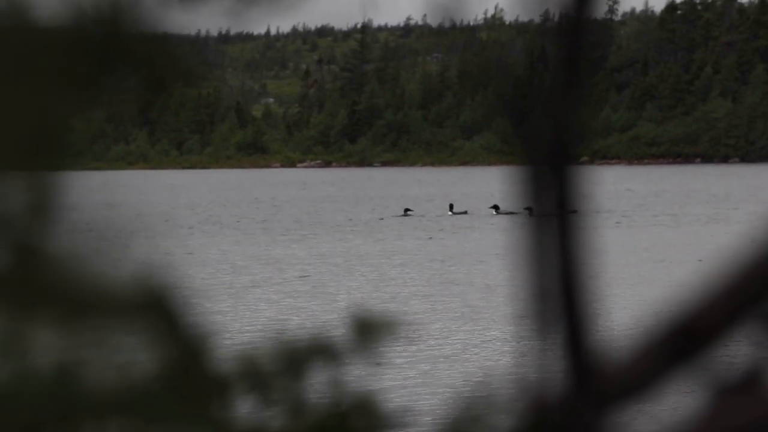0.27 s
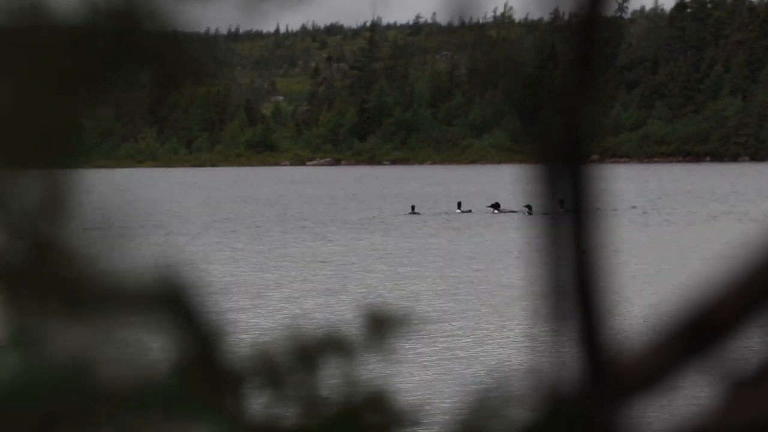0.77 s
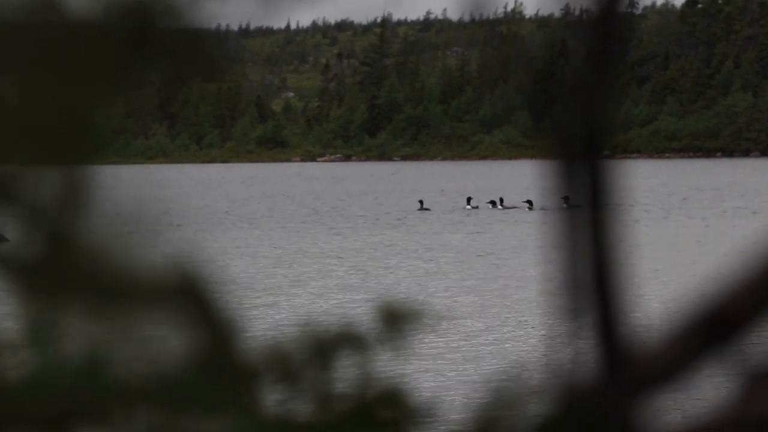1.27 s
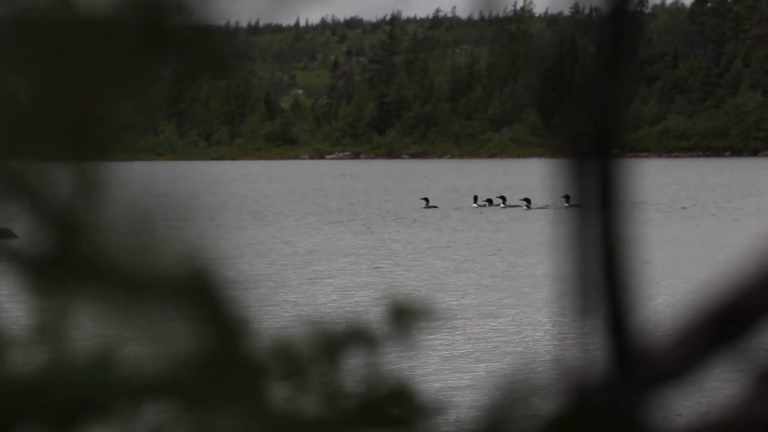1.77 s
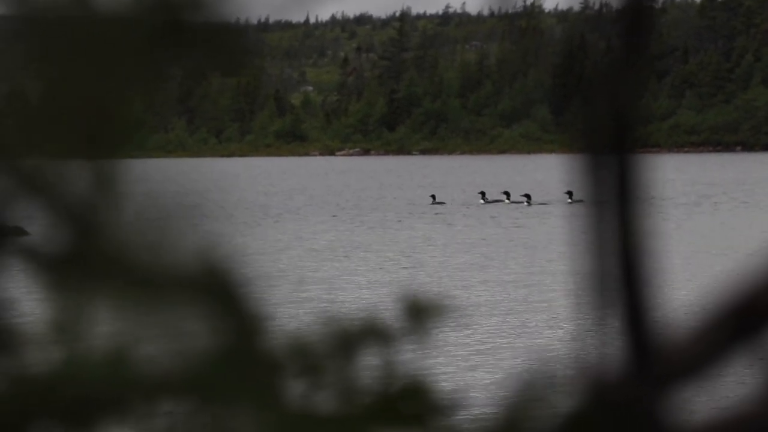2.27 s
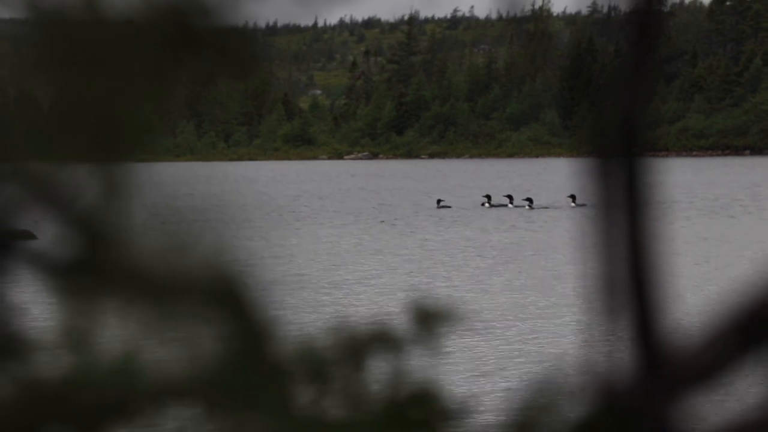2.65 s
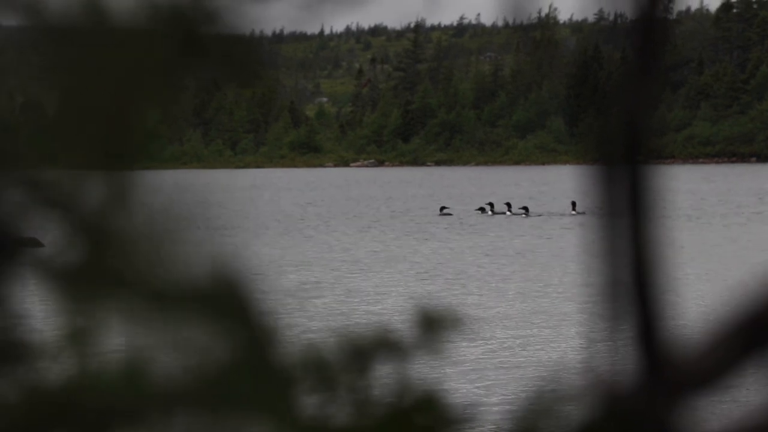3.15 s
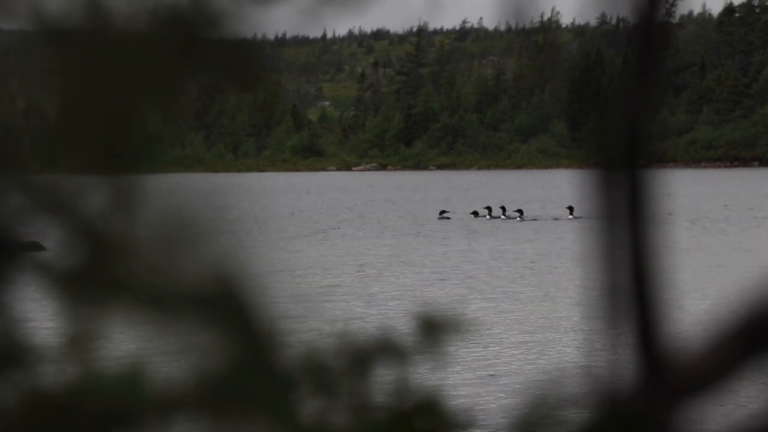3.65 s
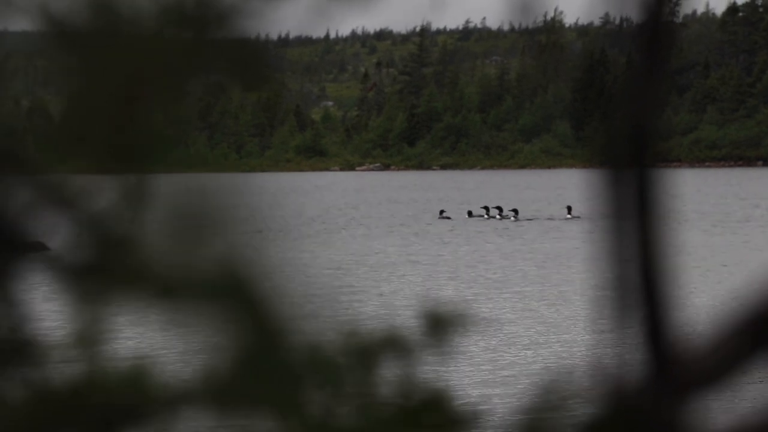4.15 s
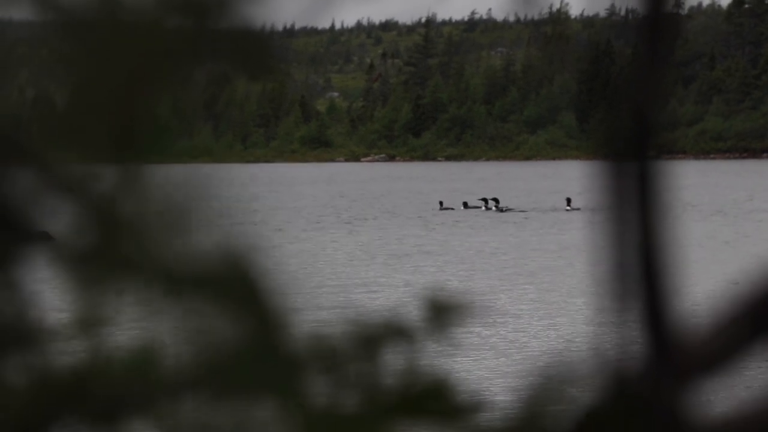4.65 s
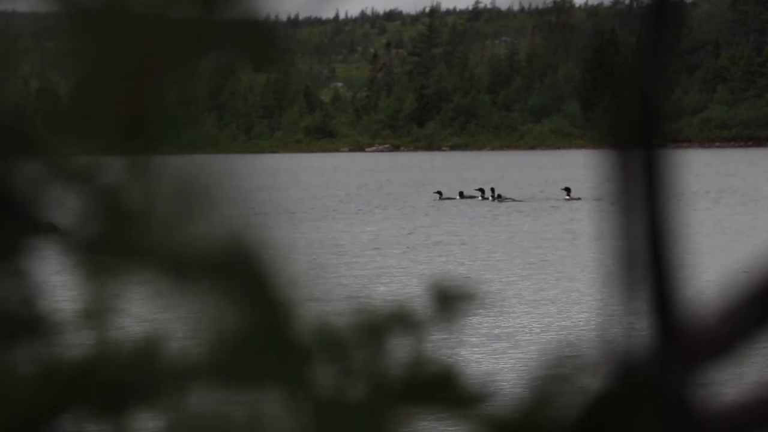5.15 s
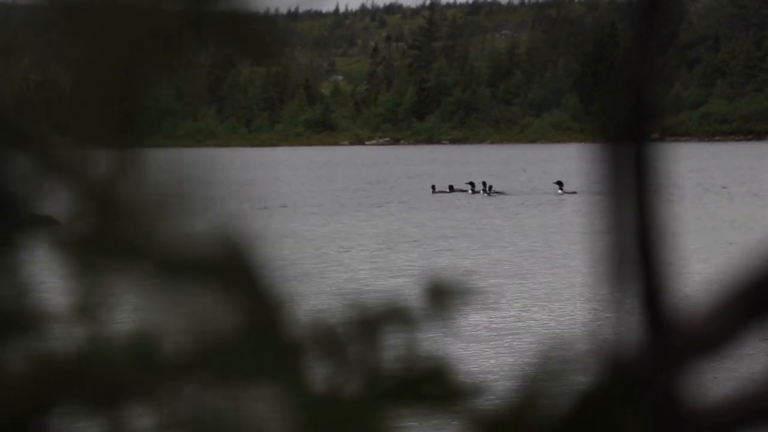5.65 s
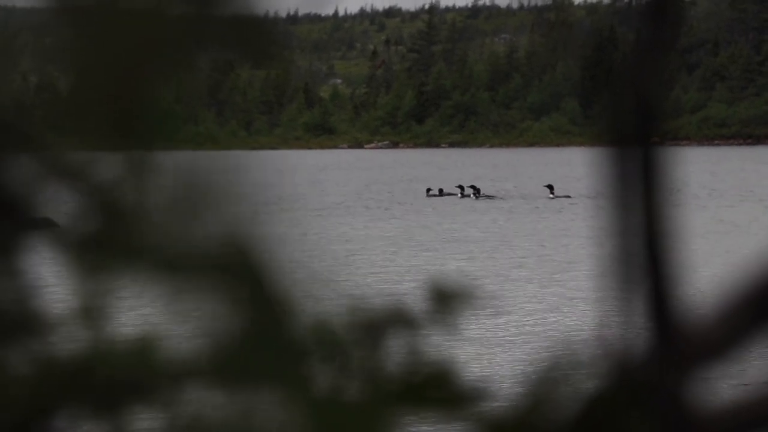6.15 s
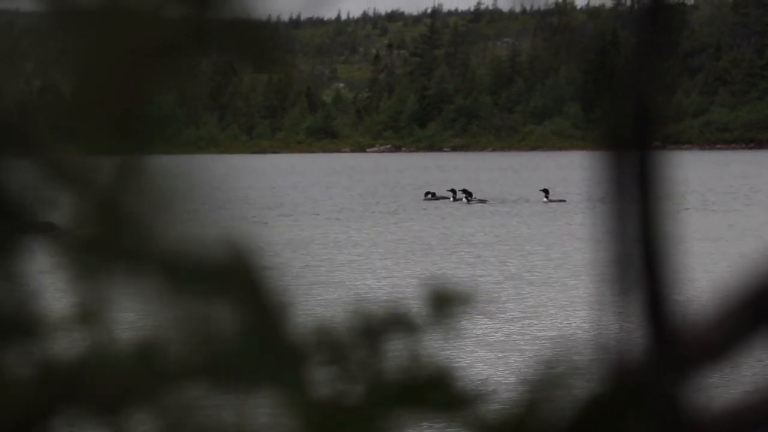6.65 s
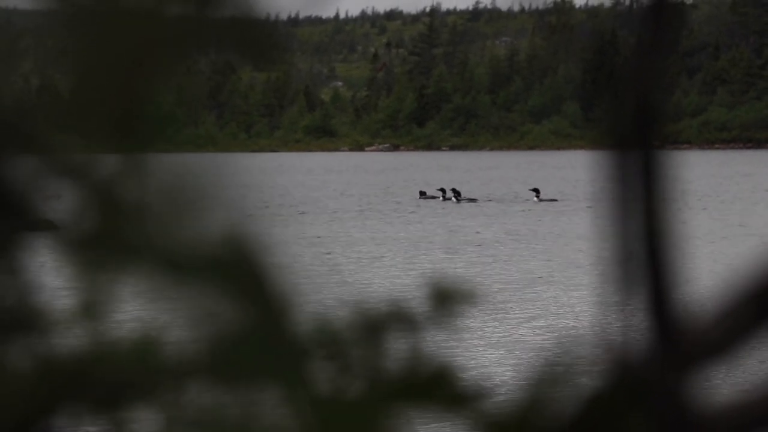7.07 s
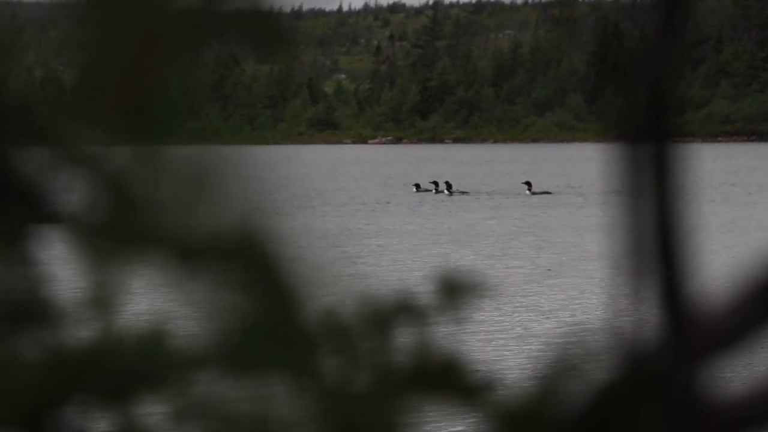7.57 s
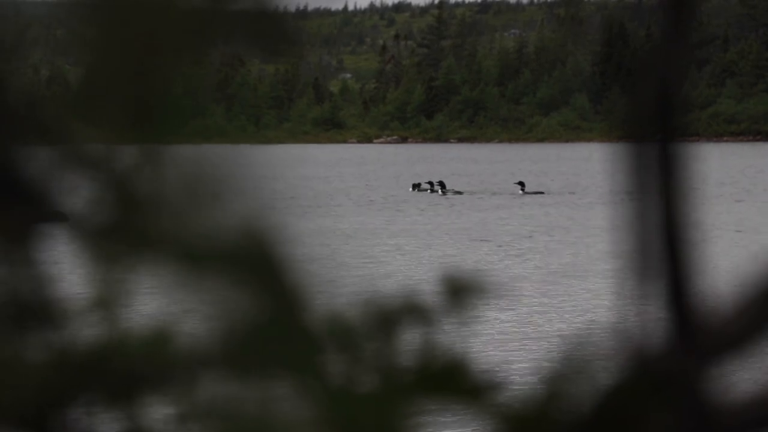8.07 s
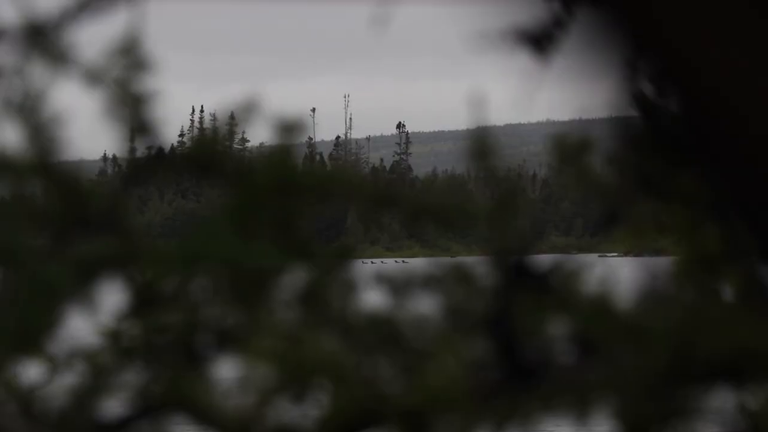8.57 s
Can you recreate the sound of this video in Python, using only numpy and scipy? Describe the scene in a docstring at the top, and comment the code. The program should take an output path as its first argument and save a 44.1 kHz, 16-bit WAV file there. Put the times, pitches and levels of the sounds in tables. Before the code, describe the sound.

Loons far out on a lake give four quavering calls, each a quick run of clean, whistling notes that jump between low and high. One comes early, two follow back to back, and the last comes after a pause. The wooded shores return faint echoes. Close to the microphone, drips tick on leaves over a light patter, a few dull knocks and a soft wind rumble and hiss.

```python
"""Loons far out on a lake give four quavering calls, each a run of short arched notes (quavers).
A bird's voice organ makes a clean, whistling tone that jumps between a low and a high register.
The wooded shores throw the calls back, once right away and again about a second later.
Close by, drips tick on leaves over a light patter, a few dull knocks, a low wind rumble and hiss."""
import sys
import numpy as np
from scipy import signal
from scipy.io import wavfile
from scipy.ndimage import uniform_filter1d

SR = 44100
rng = np.random.default_rng(int(sys.argv[2]) if len(sys.argv) > 2 else 0)


def inscribe(sig):
    """Save sig as 16-bit PCM at rate SR to the path in sys.argv[1].

    A 1-D sig is mono; a 2-D sig holds one channel per row.
    Samples are clipped to [-1, 1] before scaling.
    """
    pcm = np.round(np.clip(np.atleast_2d(sig).T, -1, 1) * 32767)
    wavfile.write(sys.argv[1], SR, pcm.astype(np.int16))


N = 388962
LEFT_LEAD = 11  # samples by which nearby sound reaches the left microphone first

# The loons' notes. Each row: start and end in seconds, pitch in Hz at the start, middle and end,
# base level in dB, harmonics two, three and four in dB against the note, swell in dB over the note.
QUAVERS = [(0.508, 0.523, 930, 1046, 1200, -53, -30, -30, -35, 8),
           (0.526, 0.586, 794, 735, 660, -41.5, -9, -25, -29, 1.5),
           (0.585, 0.655, 600, 818, 848, -42, -7.5, -38, -41, 2),
           (0.656, 0.691, 1148, 946, 950, -32, -39, -36, -32, -1.5),
           (0.685, 0.769, 844, 1234, 886.7, -30.5, -30, -42, -46, 0),
           (0.796, 0.866, 1208, 1403, 1215, -36, -52, -40, -58, -6),
           (0.883, 0.938, 671, 758, 919, -39, -10.5, -37, -35, 0),
           (0.939, 0.972, 1157, 1034, 842, -28, -34, -45, -51, 3),
           (0.988, 1.095, 593, 669.4, 559, -47, -9, -39, -41, 2.5),
           (2.553, 2.627, 648, 812, 844, -45, -6, -25.5, -38, 1),
           (2.626, 2.654, 1084, 994, 988, -35, -40, -47, -45, 1.5),
           (2.64, 2.728, 927, 1174, 902, -33, -25, -40, -32.5, 6),
           (2.726, 2.822, 741, 1136, 865, -33.5, -26.5, -34, -37, 7),
           (2.836, 2.892, 619, 783, 884, -42, -6.5, -51, -15, -4.5),
           (2.895, 2.927, 1067, 983, 850, -36.5, -25, -55, -47, -9),
           (2.936, 3.044, 538, 727, 547, -45, -3.5, -17.5, -43, 1.5),
           (3.082, 3.1, 915, 1012, 1112, -49.5, -37, -31, -33, 8),
           (3.097, 3.171, 727, 784, 644, -41, -4, -20, -41, 2),
           (3.166, 3.22, 614, 772, 976, -37.5, -6, -39, -27, 4),
           (3.218, 3.264, 1256, 1105, 803, -18, -31, -48, -49, 2.5),
           (3.269, 3.358, 858, 1235, 805, -20, -31.5, -49.5, -46.5, 1),
           (3.364, 3.453, 834, 1217, 763, -22.5, -29, -46, -51, 0),
           (3.466, 3.548, 836, 1193, 679, -23.5, -26, -49, -45, 1.5),
           (3.562, 3.668, 558.5, 766, 480, -40, -4, -23, -30, -2),
           (5.994, 6.075, 653, 789, 660, -40.5, -1, -15, -47, -1),
           (6.075, 6.164, 782, 1209, 829, -25, -28.5, -48, -53, 7.5),
           (6.167, 6.262, 782, 1228, 730, -22.5, -27.5, -52, -52, 4),
           (6.258, 6.358, 646, 1199, 600, -23.5, -28.5, -53, -49, 5),
           (6.366, 6.409, 631, 729, 899, -37, -1, -38, -42, -6),
           (6.407, 6.456, 1191, 1029, 690, -23, -23, -55, -47, 3),
           (6.477, 6.573, 599.6, 647, 520, -46, 0, -24, -41, 0)]


def loons():
    """The voice organ sings a tone with five harmonics, and the throat colours the upper four."""
    # The throat's colour. Each row: frequency in Hz, boost in dB.
    throat = [(1250, -3), (1400, -10.5), (1600, 5.5), (1800, 0), (2350, -1.5), (2800, -1), (3300, 7),
              (4500, -1.5), (6000, -3)]
    # Where the calls sit between the sides. Each row: frequency in Hz, left minus right in dB.
    call_pan = [(620, 1.5), (850, -4), (1000, 0.5), (1150, 2), (1230, 5.5), (1400, -4), (1500, -1.5),
                (1700, 0.5), (3000, -6.5)]
    # Brief rasps: a flutter splits side tones off the note.
    # Each row: start and end in seconds, flutter in Hz, level in dB against the note.
    rasps = [(3.393, 3.423, 190, -29.5), (6.093, 6.122, 400, -33.5)]
    hz, gains, edge_shares = np.full(N, 700.), np.zeros((5, N)), joins()
    for k, (start, end, *shape) in enumerate(QUAVERS):
        at = slice(round(start * SR), round(end * SR))
        hz[at], gains[:, at] = quaver(at.stop - at.start, edge_shares[k:k + 2], *shape)
    hz, gains = smooth(hz, 90), smooth(gains, 90)
    waver = smooth(rng.standard_normal((6, N)), 250)
    waver /= waver.std()
    hz = hz * (1 + 0.0053 * waver[0])  # slightly unsteady pitch
    gains = gains * amp(np.c_[[.3, 1.5, 3, 3.5, 3.5]] * waver[1:])  # overtones flicker more than the note
    right_lead_s = .00004  # the right microphone hears the calls first
    cycles = np.cumsum(hz) / SR + np.c_[[0, right_lead_s]] * hz
    out, t = 0, np.arange(N) / SR
    for k, gain in enumerate(gains, 1):
        gain = gain * amp(curve_at(throat, k * hz) * (k > 1))
        out += gain * np.sin(2 * np.pi * k * cycles) * panned(curve_at(call_pan, k * hz))
    for start, end, flutter_hz, db in rasps:
        gate = uniform_filter1d(1. * (t > start) * (t < end), size=130)
        side_tones = sum(np.sin(2 * np.pi * (cycles + j * flutter_hz * t)) for j in (-1, 1, 2, 3))
        out += amp(db) * gate * gains[0] * side_tones
    return np.sqrt(2) * out


def quaver(length, edge_share, start_hz, mid_hz, end_hz, peak_db, second_db, third_db, fourth_db, swell_db):
    """One note's pitch and harmonic strengths: it gets quieter where its pitch sags and at both edges."""
    # The low, then the high register. Each row: lowest pitch in Hz, dB lost a third below the top pitch
    # going up, the same going down, steepness of that loss, fade-in and fade-out in seconds, dB lost at
    # the edges, fifth harmonic in dB (against the note if low, against the fourth harmonic if high).
    registers = [(600, 4.2, 7.8, 0.86, 0.019, 0.016, 8.8, -39),
                 (872, 21, 26, 1.63, 0.019, 0.0048, 5.9, -5.5)]
    # Extra dB that harmonics two to five lose for each dB that the note loses.
    overtone_fade = (0.55, 0.69, 1.5, 1.1)
    high = max(start_hz, mid_hz, end_hz) > 1000
    floor_hz, up_db, down_db, steep, attack, release, edge_db, fifth_db = registers[int(high)]
    t = np.arange(length) / SR
    arch = np.polyval(np.polyfit([0, .5, 1], [start_hz, mid_hz, end_hz], 2), t / t[-1])
    sag = 3 * (1 - arch / arch.max())
    opening = edge_share[0] * np.maximum(1 - t / attack, 0)
    closing = edge_share[1] * np.maximum(1 - t[::-1] / release, 0)
    lost_db = np.where(t < t[arch.argmax()], up_db, down_db) * sag ** steep + edge_db * (opening + closing)
    if high:
        fifth_db += fourth_db
    elif end_hz > mid_hz:
        fifth_db += 10  # stronger in low notes that end rising
    level_db = peak_db + swell_db * (t / t[-1] - .5)
    harmonics_db = np.c_[[0, second_db, third_db, fourth_db, fifth_db]]
    fades = 1 + np.c_[[0, *overtone_fade]]
    return np.maximum(arch, floor_hz), amp(level_db + harmonics_db - fades * lost_db)


def joins(slur_share=0.39):
    """How much of the level dip is left at each note edge: less where two notes run smoothly together."""
    start, end, start_hz, _, end_hz = np.transpose(QUAVERS)[:5]
    no_gap = start[1:] - end[:-1] < .005
    no_jump = abs(np.log(start_hz[1:] / end_hz[:-1])) < .2
    return np.r_[1, np.where(no_gap & no_jump, slur_share, 1), 1]


def shores(calls):
    """Trees scatter the calls into many tiny reflections, which swell and die away for each shore."""
    # How strongly each call reaches the shores. Each row: start in seconds, gain in dB.
    echo_send = [(0, 4), (1.5, -0.5), (3.06, -2.5), (5, -1.3)]
    # The echoes. Each row: delay, rise time and time to fade by 60 dB, all in seconds, then level in dB.
    echoes = [(0.023, .005, 0.24, -14.5), (.06, 0.037, 0.88, -25), (1.04, 0.1, 1.1, -33),
              (1.14, 0.003, 0.029, -41.5), (1.5, .2, 1.43, -41.5)]
    starts, send_db = np.transpose(echo_send)
    sent = calls * amp(send_db[np.searchsorted(starts, np.arange(1, N + 1) / SR) - 1])
    t = np.arange(3 * SR) / SR
    reflections = rng.choice([-1., 1.], (2, len(t))) * (rng.random((2, len(t))) < .05)
    envelope = 0
    for delay, rise, fade, db in echoes:
        age = np.maximum(t - delay, 0)
        swell = (1 - np.exp(-age / rise)) * amp(-60 * age / fade)
        envelope += amp(db) * swell / np.linalg.norm(swell * reflections[0])
    return signal.fftconvolve(sent, reflections * envelope, axes=1)[:, :N]


def drips():
    """Single drops hit leaves; the larger the drop, the more its snap stands out over its splash."""
    # Each row: start in seconds, peak in dB, lows, highs and very top in dB against the middle
    # frequencies, left minus right in dB.
    drops = [(0.0626, -43.5, -2, -3, -23, 3), (0.632, -33.5, -8, -11, -12, 2),
             (0.722, -27.5, 5, -2, -2, 4.5), (0.75, -42, -5, -22, -18, 4), (1.1156, -40.5, 3, -18, -17, 3),
             (1.1838, -43.5, -18, -12, -19, 4), (1.5095, -47, 3, 8, 14, 8), (1.6408, -44, -4, -11, -16, 7),
             (1.9764, -32, -0.5, -2, -2.5, 4), (2.458, -41, -1, 3, 6, 5), (2.5165, -31, 3, -4, -3, 8),
             (2.5383, -38, -2, 0, -2, 1), (2.7681, -36.5, 6, 3, 2.5, 4), (2.8616, -39.5, -6, -2.5, -2, 1.5),
             (3.0165, -44.5, -8, -8, -13, 1.5), (3.41, -37.5, 7, -8.5, -9, 2),
             (3.4293, -38, 12, -4, -11, -1), (3.5316, -37, 1, 0, -1, 2), (3.6278, -31.5, 1, -8, -13, 2),
             (3.8899, -41, -10, -7, -13, 6), (3.961, -35, 0, 0, .3, 3.5), (4.1024, -37.5, -4, -8, -21, 1),
             (4.6004, -40.5, -11, -6, -12, 2), (4.6875, -42, -1, -5, -15, 0),
             (4.8978, -22, -3, -4.5, -3, 6), (5.57, -40.5, -20, -9, -17, 10), (5.586, -25.5, 0, 4, -1, 2.5),
             (5.6417, -41.5, -10, -9, -15, 0), (5.7898, -27.5, -13, -2.5, -10, 7),
             (5.9993, -41, -4, 4, 3, 6), (6.012, -37, 8, -11, -11, 2), (6.242, -34, -13, -18, -13, 6),
             (6.358, -42.5, -4, -17, -17, 6), (7.0284, -41.5, -16, -7, -18, 4.5),
             (7.1282, -39, -3, -8, -13, 7), (7.2603, -40, -10, 10.5, 10, 6),
             (7.447, -29.5, -6, -10, -10.5, 5), (7.518, -40, 3, 7, 3, 6), (7.662, -45.5, -20, -16, -18, 4),
             (7.744, -28.5, -10, -7, 1, 5), (7.799, -43, -2, -9, -12, 4), (7.939, -31.5, -6, 4, 0, 7),
             (7.962, -35, -7, -4, -8, 1), (8.42, -45, 12, -8, 2, 6), (8.4402, -36, 5.5, -9, -8, 3),
             (8.4828, -36, -1, -9, -11, 5), (8.5125, -46, -6, -4, -5, 2.5),
             (8.6757, -39, 6.5, -3, -17, -14)]
    out = np.zeros((2, N))
    for start, peak_db, low_db, high_db, top_db, pan_db in drops:
        splash_db = -16.5 - 0.52 * (peak_db + 40)
        sound = leaf_tick(low_db, high_db, top_db, splash_db, pan_db)
        add(out, start, sound * amp(peak_db) / abs(sound.mean(0)).max())
    return out


def leaf_tick(low_db, high_db, top_db, splash_db, pan_db):
    """One drop lands: a snap of noise and a longer splash, both coloured by the leaf."""
    # The leaf colour that all drips share. Each row: frequency in Hz, boost in dB.
    leaf = [(200, 4), (750, 10.5), (1800, 6.5), (3700, 3), (5500, 0.5), (8000, 4), (12500, 5.5),
            (16500, -9.5)]
    snap_s, splash_s = 0.01, 0.17  # time to fade by 60 dB
    t, hz = np.arange(4096) / SR, abs(np.fft.fftfreq(1024, 1 / SR))
    left, other = rng.standard_normal((2, len(t)))
    envelope = amp(-60 * t / snap_s) + amp(splash_db - 60 * t / splash_s)
    burst = np.array([left, 0.13 * left + 0.9 * other]) * envelope
    burst[:, 0] -= 4.5  # the blow itself
    bands = [(750, low_db - 7.5), (1800, low_db), (3700, 0), (8000, high_db), (12500, top_db)]
    log_gain = np.log(amp(curve_at(leaf, hz) + curve_at(bands, hz)))
    # A minimum-phase filter: it rings only after the blow.
    colour = np.fft.ifft(np.exp(signal.hilbert(log_gain).conj())).real[:512]
    sound = signal.fftconvolve(burst, colour[None], axes=1)
    sound[1] = np.roll(sound[1], LEFT_LEAD)
    return sound * panned(pan_db)[:, None]


def patter(drops_per_s=110, level_db=-69.5):
    """Many faint drips land at random moments, a few larger, in eight tone colours."""
    sizes = amp(2.8 * np.minimum(rng.exponential(1, N), 3))
    hits = sizes * (rng.random(N) < drops_per_s / SR)
    kinds, tilts_db = rng.integers(0, 8, N), 19.2 * rng.standard_normal(8)
    out = 0
    for k, tilt_db in enumerate(tilts_db):
        tick = leaf_tick(-5.5, -7.5 - tilt_db, -12 - tilt_db, splash_db=-24, pan_db=7.5)
        out += signal.oaconvolve((hits * (kinds == k))[None], tick / np.linalg.norm(tick))[:, :N]
    return amp(level_db) * unit_level(out)


def knocks(rise_s=0.00058, fade_s=0.0098):
    """Dull thuds close by: low tones that die within a few cycles."""
    # Each row: start in seconds, level in dB before fading, pitch in Hz.
    thuds = [(2.612, -27, 230.2), (5.7888, -27, 331.8), (7.665, -33.5, 348), (7.718, -31.5, 168)]
    out, t = np.zeros((2, N)), np.arange(2000) / SR
    envelope = (1 - np.exp(-t / rise_s)) * amp(-60 * t / fade_s)
    for start, db, hz in thuds:
        thud = amp(db) * np.sin(2 * np.pi * hz * t) * envelope
        add(out, start, np.array([thud, np.roll(thud, LEFT_LEAD)]) * panned(2.0)[:, None])
    return out


def wind(level_db=-53):
    """A lumpy rumble, a little to the left, rises and falls with the gusts under a smooth, wide hiss."""
    # The colour of rumble and hiss. Each row: frequency in Hz, relative level in dB.
    colour = [(22, -25), (45, -0.5), (80, -3.5), (180, -5), (300, -7), (600, -15), (1100, -16),
              (2000, -21.5), (3400, -24), (5000, -28.5), (8000, -25), (11500, -27.5), (15300, -34),
              (15900, -56)]
    # The gusts. Each row: time in seconds, relative rumble level in dB.
    gusts = [(0.0, -58.5), (0.32, -54), (0.98, -58), (2.58, -57.5), (2.72, -57.5), (4.79, -58), (5.16, -59),
             (6.29, -55), (6.73, -58.5), (7.3, -56), (8.5, -58.5), (8.82, -62)]
    # How alike the two sides are. Each row: frequency in Hz, likeness from 0 to 1.
    likeness = [(60, 0.87), (170, 0.94), (340, 0.5), (520, 0.92), (800, 0.081), (3000, 0.11),
                (9000, 0.0074)]
    # The lean to the left. Each row: frequency in Hz, left minus right in dB.
    wind_pan = [(60, 1), (240, 2.5), (950, 5.5), (3770, 2), (15000, 0.5)]
    frames, hz = N // 256 + 5, np.fft.rfftfreq(1024, 1 / SR)
    left_re, left_im, other_re, other_im, patches = rng.standard_normal((frames, 513, 5)).T
    patches = uniform_filter1d(patches, size=6, axis=0)  # random louder and softer spots
    patches = unit_level(uniform_filter1d(patches, size=8, axis=1))
    times, gust_db = np.transpose(gusts)
    gust_db = np.interp(np.arange(frames) * 256 / SR, times, gust_db - gust_db.mean())
    puffs = unit_level(uniform_filter1d(rng.exponential(1, frames) - 1, size=3))
    gust_db += 2.1 * puffs
    rumble_share = 1 / (1 + (hz[:, None] / 500) ** 2)
    shape_db = curve_at(colour, hz)[:, None] + rumble_share * gust_db + (1.23 + rumble_share) * patches
    alike = curve_at(likeness, hz)[:, None]
    left, other = left_re + 1j * left_im, other_re + 1j * other_im
    spectra = np.array([left, alike * left + np.sqrt(1 - alike ** 2) * other])
    spectra *= amp(shape_db) * panned(curve_at(wind_pan, hz))[..., None]
    left, right = signal.istft(spectra, nperseg=1024, noverlap=768)[1][:, :N]
    return amp(level_db) * unit_level(np.array([left, np.roll(right, LEFT_LEAD)]))


def amp(db):
    return 10 ** (np.asarray(db) / 20)


def unit_level(x):
    return x / np.sqrt(np.mean(x ** 2) + 1e-20)


def smooth(x, samples):
    return uniform_filter1d(uniform_filter1d(x, samples), samples)


def curve_at(points, hz):
    """Read between rows of frequency and value, on a logarithmic frequency scale."""
    point_hz, values = np.transpose(points)
    return np.interp(np.log(hz + 1), np.log(point_hz + 1), values)


def add(mix, start_s, sound):
    part = mix[:, round(start_s * SR):][:, :sound.shape[1]]
    part += sound[:, :part.shape[1]]


def panned(db):
    """Left and right gains for a left-minus-right difference in dB."""
    return amp(np.multiply.outer([.5, -.5], db))


def scene():
    """The loons and their echoes, with the nearby sounds and the wind."""
    calls = loons()
    return calls + shores(calls) + drips() + patter() + knocks() + wind()


def record(dry, low_hz=36, high_hz=16450):
    """The microphones lose the deepest bass, and the very highest treble is cut off."""
    dry = signal.sosfilt(signal.butter(2, low_hz, "high", fs=SR, output="sos"), dry)
    treble_cut = signal.firwin(511, high_hz, window=("kaiser", 9), fs=SR)
    return signal.oaconvolve(dry, treble_cut[None], "same")


dry = scene()
out = record(dry)
inscribe(out)
```